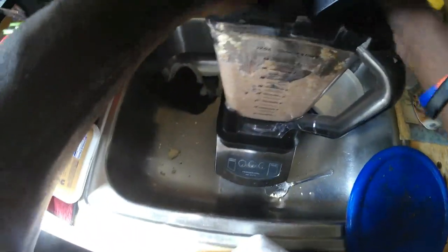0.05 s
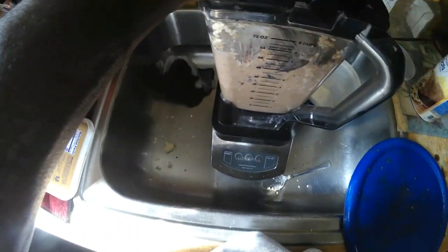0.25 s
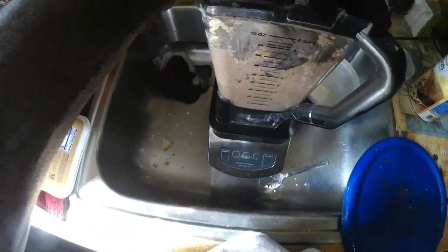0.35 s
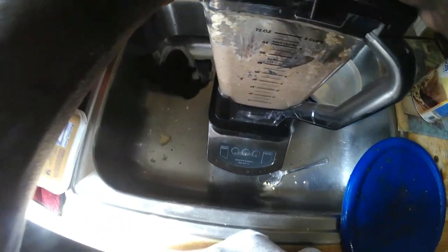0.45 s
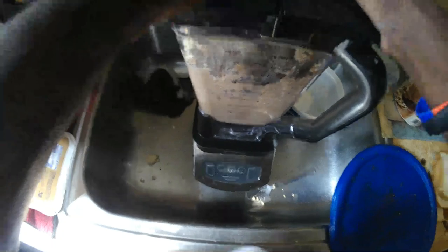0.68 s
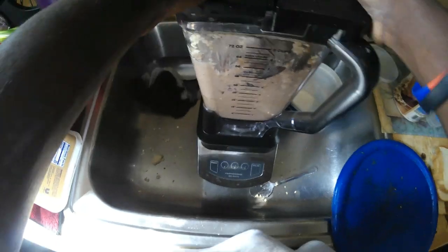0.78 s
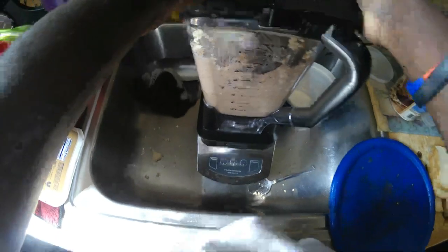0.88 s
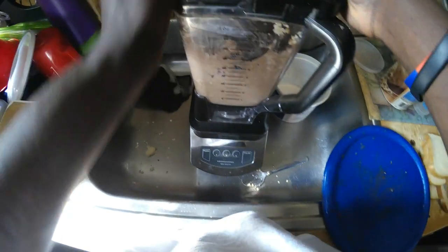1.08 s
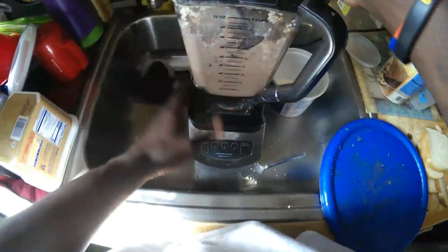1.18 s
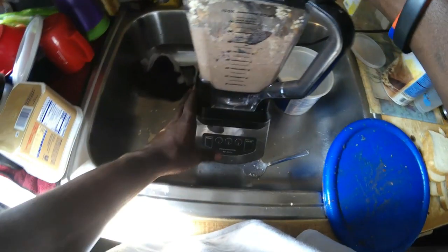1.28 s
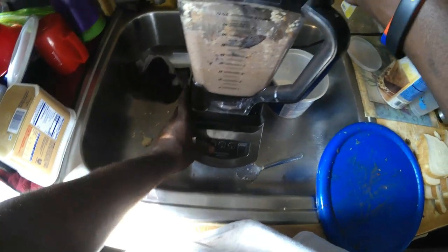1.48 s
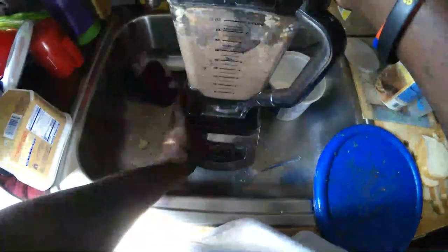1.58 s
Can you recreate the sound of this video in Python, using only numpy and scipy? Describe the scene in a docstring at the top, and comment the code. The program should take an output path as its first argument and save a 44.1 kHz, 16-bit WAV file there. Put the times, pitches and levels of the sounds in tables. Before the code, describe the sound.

Close up in a quietly humming kitchen, a plastic blender lid clicks and then cracks shut. The sink under it thumps and the jar rattles for a moment, before small ticks, soft bumps and brushing arms trail off.

```python
"""A plastic lid is pressed onto a blender jar that stands, switched off, in a steel sink.
The catch snaps, then the lid slams home: each contact cracks and the flexing plastic rings.
The sink rocks, the jar rattles on its base and small ticks follow as the hands let go.
Arms brush, rub and bump close by, over the low hum of a small kitchen."""
import sys
import numpy as np
from scipy import signal
from scipy.fft import rfft, irfft, next_fast_len
from scipy.io import wavfile
from scipy.ndimage import map_coordinates

SR = 44100
rng = np.random.default_rng(int(sys.argv[2]) if len(sys.argv) > 2 else 0)


def master_out(mix):
    """Clip the mix to full scale and print it as 16-bit PCM to the path in sys.argv[1]."""
    frames = np.transpose(np.atleast_2d(mix))
    ceiling = np.clip(frames, -1, 1)
    pcm = np.round(ceiling * 32767).astype(np.int16)
    wavfile.write(sys.argv[1], SR, pcm)


N = 72765


def lid():
    """The lid chatters into its seat in five quick contacts."""
    # contacts (time [s], level [dB], tilt [dB/octave])
    hits = [(.3328, -29.5, 4.5), (.3351, -12.5, 1), (.3372, -15.5, -2), (.3412, -16.5, -0.5),
            (.3445, -15.5, 0)]
    # lid resonances (frequency [Hz], level [dB], t60 [s])
    modes = [(200, -26.5, 0.074), (362, -13.5, 0.044), (395, -14.5, .06), (494.7, -32, .2),
             (815, -14.5, 0.046), (1214, -15, 0.054), (1370, -21.5, 0.06), (1685, -8, 0.038),
             (1858, -12, 0.064), (1993, -12, .05), (3318, -19, .04), (3435, -17.5, 0.078),
             (3666, -17.5, 0.018), (4517, -23.5, .045)]
    # crack spectrum (frequency [Hz], level [dB])
    colour = [(100, -7), (250, -7.5), (400, -1), (700, -10.5), (1800, 3.5), (2600, -13.5), (3400, -3.5),
              (5300, -21), (6500, -21.5), (8000, -29.5), (9500, -26), (15500, -62.5)]
    return snap(hits, modes, colour, ring_at_s=.3354, crack_db=-1, crack_t60_s=.0073,
                clatter_db=-10, clatter_t60_s=.062, wet_db=-14.5)


def catch():
    """The catch snaps over in four quick contacts."""
    # contacts (time [s], level [dB], tilt [dB/octave])
    hits = [(.2386, -15.5, 1), (.2404, -13.5, -0.5), (.2434, -22.5, 1), (.2462, -20.5, -3)]
    # catch resonances (frequency [Hz], level [dB], t60 [s])
    modes = [(386, -22.5, 0.054), (497, -24, .12), (608, -16.5, .065), (834, -12.5, .05), (988, -25, .07),
             (1180, -23, 0.065), (1434, -27, .089), (1690, -28, 0.12), (3265, -25, .035), (3880, -5, 0.012),
             (4600, -22, .04), (5640, -19.5, 0.022)]
    # crack spectrum (frequency [Hz], level [dB])
    colour = [(100, -14), (400, -1.5), (700, -7), (1100, 2), (1500, -3.5), (2500, -10), (3900, 1),
              (5000, -9), (6300, -6), (7800, -23), (9600, -12.5), (12000, -24.5), (15500, -33)]
    return snap(hits, modes, colour, ring_at_s=.2386, crack_db=-1, crack_t60_s=.0075,
                clatter_db=-9.5, clatter_t60_s=.072, wet_db=-9.5)


def snap(hits, modes, colour, ring_at_s, crack_db, crack_t60_s, clatter_db, clatter_t60_s, wet_db):
    """Each contact cracks and clatters, with a short tail; the plastic is rung once."""
    cracks, body = np.zeros(N), np.zeros(N)
    t = clock()[:SR // 5]
    burst = amp(crack_db) * fade(t, crack_t60_s) + amp(clatter_db) * fade(t, clatter_t60_s)
    for at_s, db, tilt_db in hits:
        add(cracks, at_s, amp(db) * burst * noise(colour, tilt_db)[:len(t)])
    add(body, ring_at_s, plastic(modes, t))
    return diffuse_tail(cracks, wet_db) + body


def plastic(modes, t):
    """Short modes build up quickly; their pitch wanders as the plastic flexes."""
    flex_depth, flex_rate_hz = .014, 250
    build_cycles, max_t60_cycles = 3.1, 200
    out = np.zeros(len(t))
    for hz, db, t60_s in modes:
        drift = np.interp(t * flex_rate_hz, np.arange(100), rng.standard_normal(100))
        phase = 2 * np.pi * hz * np.cumsum(1 + flex_depth * drift) / SR
        attack = 1 - np.exp(-t * hz / build_cycles)
        decay = fade(t, min(t60_s, max_t60_cycles / hz))
        out += amp(db) * attack * decay * np.sin(phase)
    return out


def sink():
    """The sink floor bounces in slow modes as the weight comes on."""
    # pushes (time [s], level [dB], tilt [dB/octave])
    pushes = [(0.246, -24, 0.5), (0.339, -15.5, -1.1)]
    # sink resonances (frequency [Hz], level [dB], t60 [s])
    modes = [(21.7, 2, .54), (33, -7, 0.93), (43.7, -1.5, .4), (60.5, -6, 0.28), (87.6, -6.5, .35),
             (111.8, -16.5, 0.56), (150, -19.5, .45)]
    rise_s = .0086
    out, t = np.zeros(N), clock()[:SR]
    attack = 1 - np.exp(-t / rise_s)
    for at_s, push_db, tilt_db in pushes:
        for hz, db, t60_s in modes:
            octaves = np.log2(hz / modes[0][0])
            ring = fade(t, t60_s) * np.sin(2 * np.pi * hz * t)
            add(out, at_s, amp(push_db + db + tilt_db * octaves) * attack * ring)
    return out


def rattle():
    """The shaken jar chatters unevenly on its base until it settles."""
    # jar resonances (frequency [Hz], Q, level [dB])
    modes = [(469, 7.3, -0.5), (1680, 19, -4), (1976, 13, -3), (3340, 18, -7.5), (4700, 5, -12.5)]
    start_s, level_db, rough_db = .35, -38.5, 2
    ring = sum(amp(db) * band(hz, q) for hz, q, db in modes)
    envelope = amp(level_db + rough_db * wobble(rate_hz=160)) * fade(clock(), t60_s=.39)
    out = np.zeros(N)
    add(out, start_s, envelope * lowpass(ring, cutoff_hz=6500))
    return out


def ticks():
    """The lid shifts in soft, short scrapes that can ring the jar."""
    # scrapes (time [s], level [dB], rise [s], t60 [s], relative ring [dB], tilt [dB/octave])
    scrapes = [(0.036, -52.5, 0.003, 0.039, -9, -4.5), (0.051, -60, 0.00097, 0.018, -29, -21),
               (.3225, -26.5, 0.0012, 0.029, -28, 1), (0.463, -38.5, 0.0052, 0.081, -19, -1.5),
               (0.545, -57.5, .005, 0.14, -24, 4), (0.613, -50.5, 0.0046, 0.091, -18, 3.5),
               (.621, -45.5, 0.0018, 0.094, 7, -5), (0.74, -43.5, 0.0024, 0.061, -22, -0.5),
               (0.807, -51.5, 0.004, 0.08, -26.5, -6.5), (.903, -56.5, 0.017, 0.095, -19.5, -1.5),
               (.995, -51, 0.002, 0.15, 3.5, -4), (1.429, -59, 0.0018, 0.043, -20.5, -3)]
    # scrape spectrum (frequency [Hz], level [dB])
    colour = [(150, -11.5), (450, -10), (780, 4.5), (1200, -7.5), (2000, -5), (2600, -14.5), (3300, -11.5),
              (7000, -25), (10000, -37), (15500, -45)]
    jar_hz, jar_t60_s = 1930, .038
    out, t = np.zeros(N), clock()[:SR // 4]
    jar = np.sin(2 * np.pi * jar_hz * t) * fade(t, jar_t60_s)
    for at_s, db, rise_s, t60_s, ring_db, tilt_db in scrapes:
        scrape = noise(colour, tilt_db)[:len(t)] * fade(np.maximum(t - rise_s, 0), t60_s)
        attack = np.minimum(t / rise_s, 1)
        add(out, at_s, amp(db) * attack * (scrape + amp(ring_db) * jar))
    return out


def brushes():
    """Skin and cloth slide in bright, grainy swells."""
    # strokes (time [s], level [dB], half length [s], relative hiss [dB])
    strokes = [(0, -60.5, 0.016, -21), (0.22, -63.5, 0.043, -21), (0.72, -67.5, 0.023, -24.5),
               (0.775, -63.5, 0.013, -7), (1.066, -61.5, 0.059, -30)]
    # sliding spectrum (frequency [Hz], level [dB])
    colour = [(300, -12.5), (1600, 8), (2600, -5), (4000, -4), (7000, -17), (10000, -25), (15500, -26)]
    slide, hiss = noise(colour), band(hz=9200, q=6)
    grain_db = 1.2 * wobble(rate_hz=120)
    return sum(amp(db + grain_db) * swell(at_s, half_s) * (slide + amp(hiss_db) * hiss)
               for at_s, db, half_s, hiss_db in strokes)


def rubs():
    """The moving arm rubs in dull, narrow bands of noise."""
    # strokes (time [s], level [dB], half length [s], centre [Hz], Q)
    strokes = [(0.027, -51, 0.054, 417, 4.3), (0.205, -55, 0.043, 603, 9.1), (0.916, -49.5, 0.013, 337, 3),
               (1.12, -46.5, 0.03, 376, 2.4), (1.185, -49.5, 0.036, 600, 7.2),
               (1.254, -44.5, 0.026, 390, 3.4), (1.295, -53.5, 0.059, 1050, 9.8),
               (1.32, -54.5, .035, 543, 6), (1.441, -49, 0.021, 490, 14), (1.604, -52, 0.17, 415, 3.3)]
    friction = sum(amp(db) * swell(at_s, half_s) * band(hz, q) for at_s, db, half_s, hz, q in strokes)
    return lowpass(friction, cutoff_hz=1700)


def bumps():
    """Handling makes soft, low thuds."""
    # thuds (time [s], level [dB], half length [s])
    thuds = [(0.174, -39, 0.023), (0.617, -41, 0.03), (0.808, -38.5, 0.027), (0.915, -36.5, 0.011),
             (0.987, -41.5, 0.025), (1.25, -34.5, 0.011), (1.298, -40, 0.046), (1.502, -45, 0.028)]
    # thud spectrum (frequency [Hz], level [dB])
    colour = [(20, 2.5), (50, -2), (110, 4.5), (170, -19), (400, -27), (1500, -63)]
    return sum(amp(db) * swell(at_s, half_s) for at_s, db, half_s in thuds) * noise(colour)


def slip():
    """Fingers slip off the lid in a thin hiss."""
    # hiss (time [s], level [dB], t60 [s], centre [Hz], Q)
    hiss = (1.005, -66.5, .36, 10200, 12)
    at_s, db, t60_s, hz, q = hiss
    out = np.zeros(N)
    add(out, at_s, amp(db) * fade(clock(), t60_s) * band(hz, q))
    return out


def kitchen():
    """Air, an uneven rumble, a wavering hum and a thin whine; the level dips briefly once."""
    # air spectrum (frequency [Hz], level [dB])
    air_colour = [(76, -25.5), (130, -8.5), (180, -1.5), (260, -10), (370, -1), (500, -8), (650, -23),
                  (1020, -16.5), (1200, -22.5), (2000, -29), (2500, -36), (3260, -33), (4200, -39.5),
                  (9000, -47.5), (15500, -45.5)]
    # rumble spectrum (frequency [Hz], level [dB])
    rumble_colour = [(10, -6.5), (25, 4), (48, 5.5), (75, -4), (120, -15.5), (200, -12.5), (600, -70.5)]
    air_db, rumble_db, hum_db, whine_db = -52, -43, -53, -86
    hum_hz, dip_db = 109.9, -9.5
    hum_phase = 2 * np.pi * hum_hz * clock() + .44 * wobble(rate_hz=23)
    hum = np.sqrt(2) * np.sin(hum_phase) * amp(hum_db + 4.7 * wobble(rate_hz=16))
    rumble = noise(rumble_colour) * amp(rumble_db + 2.3 * wobble(rate_hz=6.4))
    air = amp(air_db) * noise(air_colour)
    whine = amp(whine_db) * band(hz=11120, q=71)
    return (air + rumble + hum + whine) * amp(dip_db * swell(at_s=.081, half_s=.016))


def diffuse_tail(x, wet_db):
    """Adds a short, diffuse noise tail after each hit; each frequency dies at its own rate."""
    # tail decay (frequency [Hz], t60 [s])
    decay_times = [(150, 0.33), (500, 0.96), (1000, 0.4), (1900, 0.37), (3300, 0.38), (4200, 0.23),
                   (6500, 0.22), (10000, .23), (14000, 0.15)]
    # tail spectrum (frequency [Hz], level [dB])
    colour = [(100, 12.5), (280, 4), (450, 2), (900, -4.5), (1800, 0), (2500, -9), (3200, -7.5), (3900, -8),
              (4700, -0.5), (7500, -10), (9800, -3), (15000, -6.5)]
    onset_s = .0065
    hz, t, spectrum = signal.stft(rng.standard_normal(SR // 2), SR, nperseg=256)
    envelope = fade(t, along(decay_times, hz)[:, None]) * (1 - np.exp(-t / onset_s))
    tail = signal.istft(spectrum * envelope, SR, nperseg=256)[1]
    wet = signal.fftconvolve(x, tail / np.linalg.norm(tail))[:N]
    return x + amp(wet_db) * filtered(wet, lambda f: amp(along(colour, f)))


def amp(db):
    return 10 ** (np.asarray(db) / 20)


def unit_rms(x):
    return x / np.sqrt(np.mean(x ** 2) + 1e-20)


def clock():
    return np.arange(N) / SR


def fade(t, t60_s):
    return np.exp(-np.log(1000) * t / np.maximum(t60_s, 1e-4))


def swell(at_s, half_s):
    return np.exp(-.5 * ((clock() - at_s) / half_s) ** 2)


def wobble(rate_hz):
    """Smooth random curve, rate_hz knots a second."""
    return map_coordinates(rng.standard_normal(200), [clock() * rate_hz], mode="wrap")


def along(points, hz):
    """Interpolates (frequency [Hz], value) points on a log axis."""
    knots_hz, values = np.transpose(points)
    return np.interp(np.log(hz + 1), np.log(knots_hz + 1), values)


def filtered(x, response):
    """Applies the gain response(hz)."""
    size = next_fast_len(N + SR // 4)
    return irfft(rfft(x, size) * response(np.fft.rfftfreq(size, 1 / SR)), size)[:N]


def lowpass(x, cutoff_hz):
    return filtered(x, lambda hz: 1 / (1 + (hz / cutoff_hz) ** 4))


def noise(colour, tilt_db=0):
    """Coloured noise of rms 1, tilted by tilt_db per octave above 300 Hz."""
    def gain(hz):
        octaves = np.log2(np.maximum(hz, 300) / 1000)
        return amp(along(colour, hz) + tilt_db * octaves)
    return unit_rms(filtered(rng.standard_normal(N), gain))


def band(hz, q):
    """Noise of rms 1 in one resonance."""
    def resonance(f):
        damping = 1j * f * hz / q
        return damping / (hz * hz - f * f + damping)
    return unit_rms(filtered(rng.standard_normal(N), resonance))


def add(out, at_s, x):
    start = max(round(at_s * SR), 0)
    out[start:start + len(x)] += x[:N - start]


def scene():
    """Two snaps, the settling blender and the handling over the kitchen background, in mono."""
    snaps = catch() + lid()
    background = kitchen()
    settling = rattle() + diffuse_tail(ticks(), wet_db=-14) + sink()
    handling = brushes() + rubs() + bumps() + slip()
    return (snaps + settling + handling + background)[None]


def record(dry):
    """A steep band limit removes the highest treble."""
    top_hz = 15600
    return filtered(dry[0], lambda hz: 1 / np.sqrt(1 + (hz / top_hz) ** 160))[None]


dry = scene()
out = record(dry)
master_out(out)
```